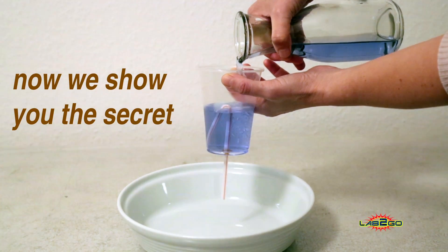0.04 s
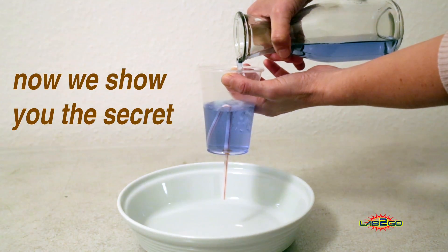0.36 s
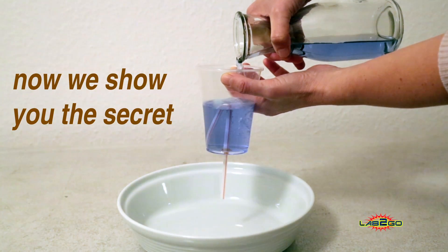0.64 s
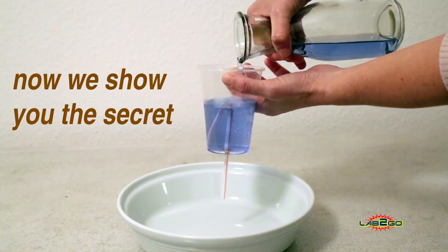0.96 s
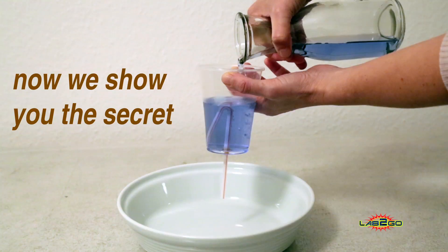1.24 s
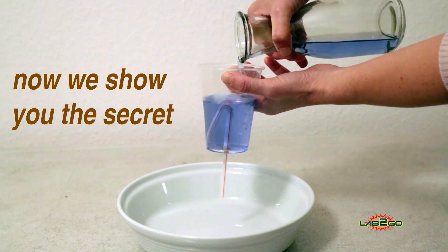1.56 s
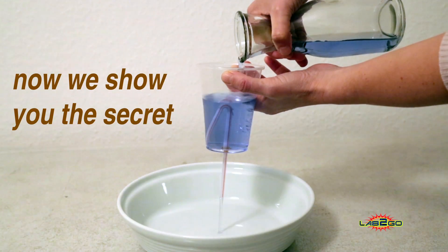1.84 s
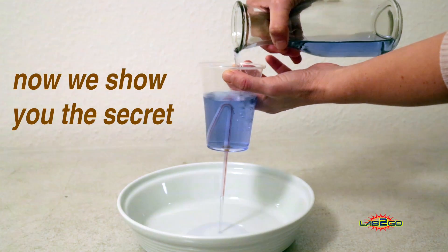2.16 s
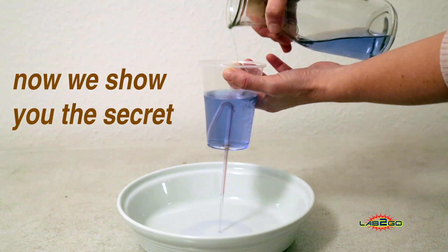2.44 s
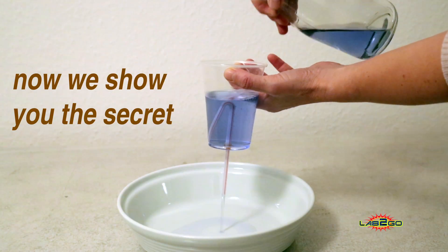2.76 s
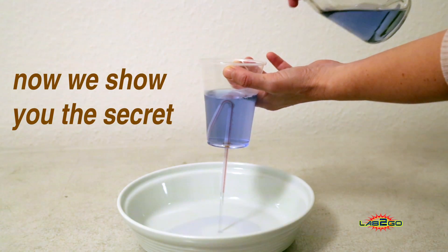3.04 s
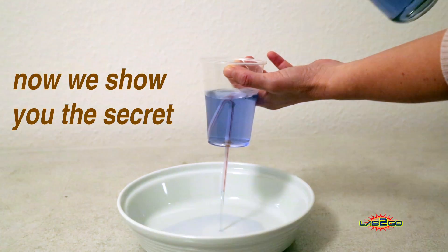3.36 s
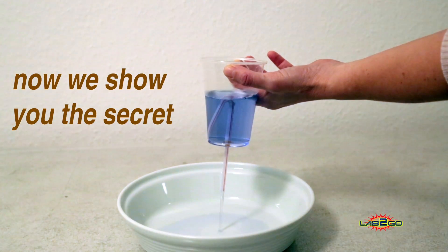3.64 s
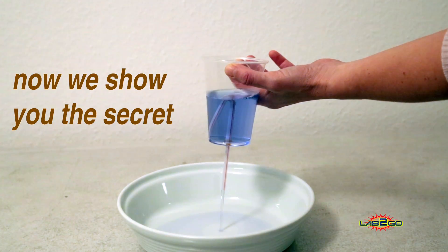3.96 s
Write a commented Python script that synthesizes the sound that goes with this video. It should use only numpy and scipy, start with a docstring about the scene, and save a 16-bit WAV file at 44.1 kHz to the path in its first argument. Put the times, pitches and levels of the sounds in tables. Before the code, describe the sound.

Water trickles and burbles into a plastic cup, ending in a louder gurgle.

```python
"""Water poured into a plastic cup

Water runs from a glass flask into a hand-held cup that drains into a bowl, in a small live room.
The stream traps air: large bubbles burble, small ones plip, tiny ones burst, and the vessels ring.
The flask taps the cup lightly. The pour ends in one louder gurgle, leaving the quiet room."""
import sys
import numpy as np
from scipy import signal
from scipy.fft import rfft, irfft
from scipy.io import wavfile

SR = 44100
rng = np.random.default_rng(int(sys.argv[2]) if len(sys.argv) > 2 else 0)


def put_to_file(sound):
    """Save the sound as 16-bit audio at rate SR, in the file named by the first command-line argument."""
    columns = np.atleast_2d(sound).T  # one column per channel
    safe = np.clip(columns, -1, 1)
    whole_steps = np.round(safe * 32767)
    wavfile.write(sys.argv[1], SR, whole_steps.astype(np.int16))


N = 176400
T = np.arange(SR // 2) / SR  # impulse-response time axis, s


def amp(db):
    """Decibels to gain."""
    return 10 ** (np.asarray(db) / 20)


def at_hz(points, hz):
    """Interpolate (Hz, value) rows over log frequency."""
    knots_hz, values = np.transpose(points)
    return np.interp(np.log(hz + 1), np.log(knots_hz + 1), values)


def add(mix, start_s, sound):
    """Mix a sound in at start_s."""
    part = mix[max(round(start_s * SR), 0):][:len(sound)]
    part += sound[:len(part)]


def min_phase(points, size=2048):
    """Minimum-phase filter from (Hz, dB) rows."""
    log_gain = np.log(amp(at_hz(points, abs(np.fft.fftfreq(size, 1 / SR)))))
    spectrum = np.exp(np.conj(signal.hilbert(log_gain)))
    return np.fft.ifft(spectrum).real[:size // 2]


def through(sound, path, db):
    """Convolve with a path; db sets the rms of the first 14 ms."""
    out = signal.fftconvolve(sound, path)
    return amp(db) * out / np.sqrt(np.mean(out[:600] ** 2))


def room_tone(level_db=-57.5):
    """Steady low air noise and faint hiss."""
    # Noise spectrum. Each row: frequency in Hz, relative level in dB.
    spectrum = [(12, -44), (20, -43), (38, -2.5), (70, -11), (129, 0), (161, -3.5), (362, -6), (565, -8),
                (614, -7.5), (667, -8.5), (985, -9), (1270, -11), (1720, -11), (7730, -15), (15500, -21)]
    gain = amp(at_hz(spectrum, np.fft.rfftfreq(N, 1 / SR)))
    noise = irfft(rfft(rng.standard_normal(N)) * gain, N)
    return amp(level_db) * noise / np.sqrt(np.mean(noise ** 2))


def room_response(tail_db=4.5, build_s=0.009, early_db=4.5, early_decay_s=0.02, echoes_per_s=1500):
    """Direct sound, quick reflections off cup, table and wall, and a diffuse tail."""
    # Reverberation. Each row: frequency in Hz, T60 in s.
    t60_s = [(200, 0.61), (1300, 0.3), (3300, 0.41), (8000, 0.42), (16000, 0.27)]
    hz, t, bands = signal.stft(rng.standard_normal(len(T)), SR, nperseg=256)
    decay = np.exp(-np.log(1000) * t / at_hz(t60_s, hz)[:, None])
    tail = signal.istft(bands * decay, SR)[1][:len(T)] * (1 - np.exp(-T / build_s))
    echoes = rng.standard_normal(len(T)) * (rng.random(len(T)) < echoes_per_s / SR)
    early = echoes * np.exp(-T / early_decay_s) * (T > 0.001)
    tail *= amp(tail_db) / np.linalg.norm(tail)
    early *= amp(early_db) / np.linalg.norm(early)
    return (T == 0) + tail + early


def vessel_response(room):
    """Path out of the water: ringing cup and bowl plus room, filtered by the cup's radiation."""
    # Cup and bowl modes. Each row: frequency in Hz, gain in dB, T60 in s.
    modes = [(836, 13, 0.47), (933.6, 17.5, 0.19), (987, 14.5, 0.21), (1012, 0.5, 0.13), (1190, 13.5, 0.36),
             (1272, 9, 0.16), (1323, 17, 0.13), (1429, 14, 0.48), (1640, -2, 0.75), (1750, 9, 0.11),
             (1783, 4, 0.12), (1832, 13.5, 0.21), (2396, 14, 0.099), (2640, 8, 0.13), (2920, 4, 0.35),
             (3150, 11, 0.16), (3204, 15, 0.17), (3850, 1, 0.082)]
    # Radiation from the cup. Each row: frequency in Hz, gain in dB.
    radiation = [(100, -50.5), (400, -1), (690, -9), (830, -3.5), (950, 0.5), (1080, -1), (1350, 2),
                 (1850, 4.5), (2220, 3), (2400, -0.5), (2550, 3.5), (2800, 1), (3200, 2.5), (3450, 0),
                 (3950, 3), (4500, 3), (9000, -31), (16000, -18)]
    ring = 0
    for hz, db, t60_s in modes:
        damping = np.log(1000) / t60_s
        ring += amp(db) * 2 * damping / SR * np.exp(-damping * T) * np.cos(2 * np.pi * hz * T)
    return signal.fftconvolve(room + ring, min_phase(radiation))[:len(T)]


def bubble(hz, decay_ms, rise_per_decay=0.0062, attack_cycles=0.16):
    """An air pocket rings briefly, its pitch rising as it nears the surface."""
    age = T[:2048] * 1000 / decay_ms  # in decay times
    cycles = np.cumsum(hz * (1 + rise_per_decay * np.minimum(age, 10))) / SR
    return np.sin(2 * np.pi * cycles) * np.exp(-age) * (1 - np.exp(-cycles / attack_cycles))


def swarm(curve, path, width_oct, per_s, decay_cycles, spread_db, pitch_ratio=1, pitches=40):
    """Bubbles born at random, scattered about a level and pitch curve."""
    times_s, level_db, pitch_hz = np.transpose(curve)
    t = np.arange(0, times_s[-1], 1 / SR)
    flow = amp(np.interp(t, times_s, level_db))
    centre_oct = np.interp(t, times_s, np.log2(pitch_hz * pitch_ratio))
    octaves = np.linspace(centre_oct.min() - 2 * width_oct, centre_oct.max() + 2 * width_oct, pitches)
    peak_share = (octaves[1] - octaves[0]) / width_oct / np.sqrt(2 * np.pi)
    out, power = np.zeros(N), 0
    for octave in octaves:
        hz = 2 ** octave
        share = peak_share * np.exp(-0.5 * ((octave - centre_oct) / width_oct) ** 2)
        born = rng.random(len(t)) < share * per_s / SR
        pulses = born * amp(spread_db * rng.random(len(t)))
        ring = signal.fftconvolve(bubble(hz, 1000 * decay_cycles / hz), path)
        add(out, 0, signal.fftconvolve(pulses * flow, ring))
        power += np.mean(pulses ** 2) * np.sum(ring ** 2)
    return out / np.sqrt(power)


def trickle(vessels, rim):
    """Air trapped by the stream: large and small bubbles, with a faint fizz above."""
    # Large and small bubble swarms. Each row: time in s, level in dB, typical pitch in Hz.
    large = [(0, -49, 1270), (.25, -52.5, 1062), (.33, -53, 1244), (.5, -52.5, 1260), (.58, -49, 1443),
             (.68, -49.5, 1326), (.8, -54, 1354), (.88, -62, 1310), (1.02, -51.5, 1457), (1.1, -56.5, 1390),
             (1.3, -50.5, 1276), (1.52, -56, 1400), (1.7, -56, 1750), (1.97, -59.5, 1835),
             (2.2, -55.5, 1616), (2.33, -65.5, 1400), (2.5, -51, 1080), (2.6, -59, 1600), (2.66, -73, 1600)]
    small = [(0, -53, 3230), (.12, -62, 3240), (.38, -56, 3410), (.46, -56, 3070), (.6, -60.5, 3070),
             (.7, -58, 3400), (.78, -51.5, 2973), (.87, -52, 2804), (1.0, -52, 3330), (1.08, -50.5, 3070),
             (1.26, -56.5, 3618), (1.38, -50, 3350), (1.5, -57.5, 2800), (1.65, -58, 3530),
             (1.75, -56, 2623), (1.8, -60, 2780), (1.97, -67, 2990), (2.03, -70, 3600), (2.2, -60, 2975),
             (2.32, -55, 3310), (2.44, -55.5, 2960), (2.58, -52, 2900), (2.66, -83, 2900)]
    burble = swarm(large, vessels, width_oct=0.36, per_s=240, decay_cycles=2.45, spread_db=9.5)
    sprinkle = swarm(small, vessels, width_oct=0.17, per_s=170, decay_cycles=7.6, spread_db=11.5)
    fizz = swarm(small, rim, width_oct=0.5, per_s=62, decay_cycles=5.3, spread_db=5,
                 pitch_ratio=2.065, pitches=12)
    return burble + sprinkle + amp(-13) * fizz


def plips(vessels):
    """Distinct single bubbles ring the cup and bowl."""
    # Each row: start in s, level in dB, pitch in Hz, decay time in ms.
    bubbles = [(.001, -43.5, 1206, 0.33), (0.01, -52, 1230, 0.73), (.061, -45.5, 1300, 0.61),
               (.126, -38.5, 1315, 3.2), (0.142, -41, 1250, 1.1), (0.16, -48, 1360, 0.77),
               (.169, -40.5, 1330, 0.39), (0.2018, -37.5, 930, 0.57), (.203, -53, 557, 1.2),
               (.21, -49.5, 990, 0.8), (.223, -61, 820, 2.8), (0.345, -55, 1270, 0.56),
               (0.357, -52, 1130, 1.3), (0.407, -44.5, 1175, 2.6), (.437, -49, 3090, 0.89),
               (.44, -54, 980, 0.87), (0.518, -53.5, 2720, 0.48), (.548, -45, 1350, 0.55),
               (.558, -54, 1750, 1.9), (0.57, -49.5, 1540, 2), (.578, -53, 890, 1.3),
               (.644, -50.5, 3110, 2.9), (.677, -51.5, 3250, 2), (.679, -53, 4000, 0.8),
               (.755, -50, 3150, 0.92), (0.754, -45, 1120, 1.2), (0.778, -43, 1300, 1.2),
               (.805, -50.5, 3000, 1.7), (0.839, -65, 2780, 2.2), (.945, -42, 1300, 1.8),
               (0.947, -47.5, 3570, 1.3), (0.963, -47.5, 1330, 1.3), (0.99, -47.5, 2300, 0.79),
               (.991, -53, 1330, 1), (1.009, -51.5, 3270, 1.2), (1.015, -47, 1580, 0.9),
               (1.114, -49, 3170, 1.8), (1.137, -43, 3260, 1.3), (1.139, -54, 1050, 2.2),
               (1.191, -51, 1240, 2.6), (1.224, -46, 3830, 1.9), (1.249, -48, 1060, 1.7),
               (1.269, -47, 3180, 0.73), (1.29, -48.5, 1360, 2.2), (1.344, -48.5, 1490, 1.7),
               (1.4, -56, 3640, 1), (1.448, -49.5, 1190, 0.34), (1.506, -47.5, 2740, 1.4),
               (1.529, -52, 2760, 1.3), (1.581, -47.5, 2780, .7), (1.581, -53.5, 1380, .5),
               (1.598, -42, 1750, 0.46), (1.61, -52, 1600, 1), (1.636, -44.5, 3500, 0.37),
               (1.66, -52, 2800, 0.75), (1.676, -49.5, 2900, .6), (1.672, -56, 490, 3.2),
               (1.757, -46, 1860, 0.46), (1.782, -39.5, 1320, 2.4), (1.833, -45.5, 1310, 1.2),
               (1.843, -51.5, 4000, 1.1), (1.895, -47, 1360, 1.1), (1.908, -47, 2010, 1.2),
               (2.004, -48, 3150, 1.6), (2.006, -51.5, 3850, 1.2), (2.064, -52.5, 3050, 1.2),
               (2.093, -46.5, 1320, 0.36), (2.093, -46.5, 3080, 1.5), (2.093, -47, 2470, 1.2),
               (2.185, -55, 1930, .7), (2.25, -51, 1600, 0.41), (2.293, -52, 3220, 1.3),
               (2.308, -53.5, 2860, 1.3), (2.347, -48, 1195, 3), (2.374, -43, 1610, 1.9),
               (2.41, -45.5, 1240, 1.5), (2.422, -44, 1190, 3.2), (2.466, -46, 950, 0.85),
               (2.482, -40, 944, 1.8), (2.498, -46.5, 2890, 2.6), (2.508, -36, 1830, 4.2),
               (2.512, -45.5, 906, 6), (2.526, -39, 1820, 1), (2.571, -42.5, 1360, 1.4),
               (2.581, -49, 1600, 1.5), (2.595, -51, 2150, 0.68), (2.611, -49.5, 1410, 1.6)]
    out = np.zeros(N)
    for start_s, db, hz, decay_ms in bubbles:
        add(out, start_s, through(bubble(hz, decay_ms), vessels, db))
    return out


def pops(rim):
    """Tiny bubbles burst at the rim."""
    # Each row: start in s, level in dB, pitch in Hz, decay time in ms.
    bursts = [(.001, -53, 15100, 0.1), (.126, -64, 9080, .6), (0.152, -49, 8210, 0.41),
              (.158, -55, 8200, 0.37), (.213, -57, 9350, 1), (0.33, -53, 15000, 0.41),
              (.645, -55, 5200, 0.57), (.677, -60, 6100, 0.18), (1.218, -67, 7260, .6),
              (1.775, -49, 5100, 0.42), (2.006, -55.5, 5970, 0.11), (2.071, -54.5, 5270, 0.82),
              (2.092, -51.5, 5560, 0.083), (2.149, -57.5, 5550, .6), (2.437, -57.5, 5300, .5)]
    out = np.zeros(N)
    for start_s, db, hz, decay_ms in bursts:
        add(out, start_s, through(bubble(hz, decay_ms), rim, db))
    return out


def taps(rim, decay_s=0.0039, size=600):
    """The flask knocks the cup; the thin plastic rattles and stops almost at once."""
    # Each row: start in s, level in dB.
    knocks = [(1.757, -50), (1.783, -54), (2.409, -49), (2.466, -55.5), (2.508, -55.5), (2.57, -59.5)]
    # Cup wall spectrum. Each row: frequency in Hz, relative level in dB.
    wall = [(500, -32), (2500, -17), (4000, -7.5), (5200, -5.5), (7000, -4.5), (11000, -7), (16000, -11.5)]
    out = np.zeros(N)
    for start_s, db in knocks:
        burst = rng.standard_normal(size) * np.exp(-T[:size] / decay_s)
        rattle = signal.fftconvolve(burst, min_phase(wall))
        add(out, start_s, through(rattle, rim, db))
    return out


def scene():
    """The pour over room tone, the same in both channels."""
    room = room_response()
    vessels = vessel_response(room)
    rim = room + amp(0.5) * (T == 0)  # extra direct sound from the rim
    mix = room_tone() + trickle(vessels, rim) + plips(vessels) + pops(rim) + taps(rim)
    return np.array([mix, mix])


def record(dry, cutoff_hz=15850):
    """Steep low-pass."""
    lowpass = signal.firwin(511, cutoff_hz, window=("kaiser", 9), fs=SR)
    return signal.oaconvolve(dry, lowpass[None], "same")


dry = scene()
out = record(dry)
put_to_file(out)
```